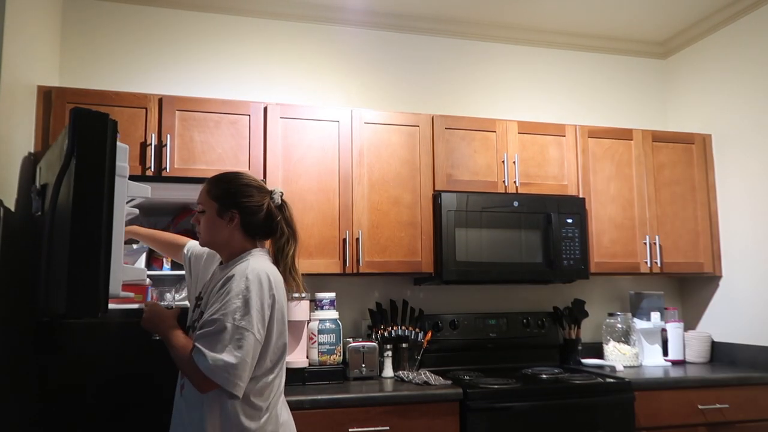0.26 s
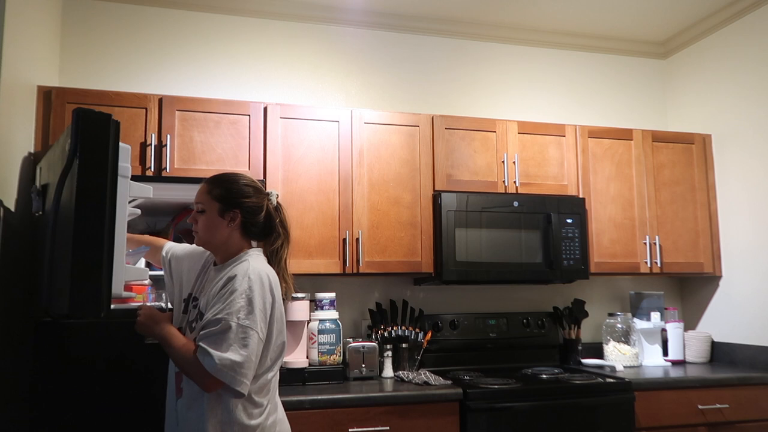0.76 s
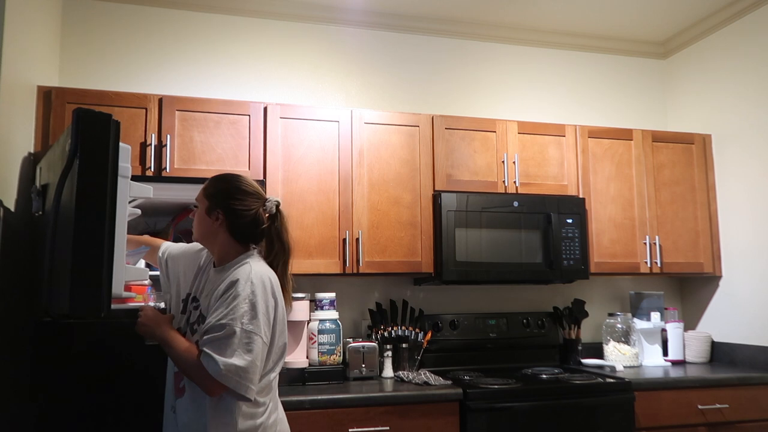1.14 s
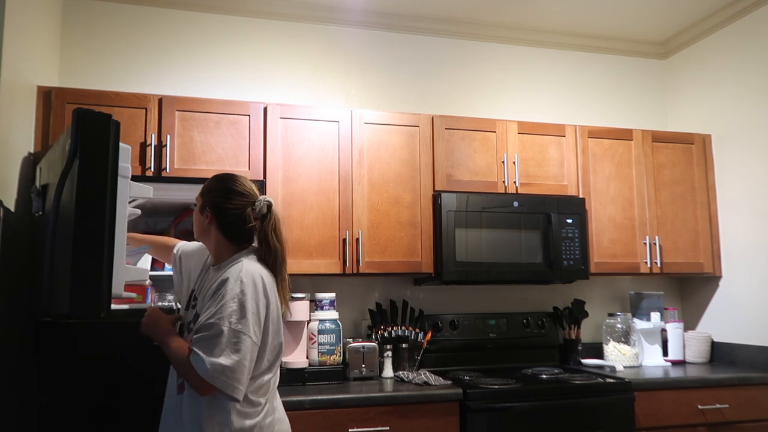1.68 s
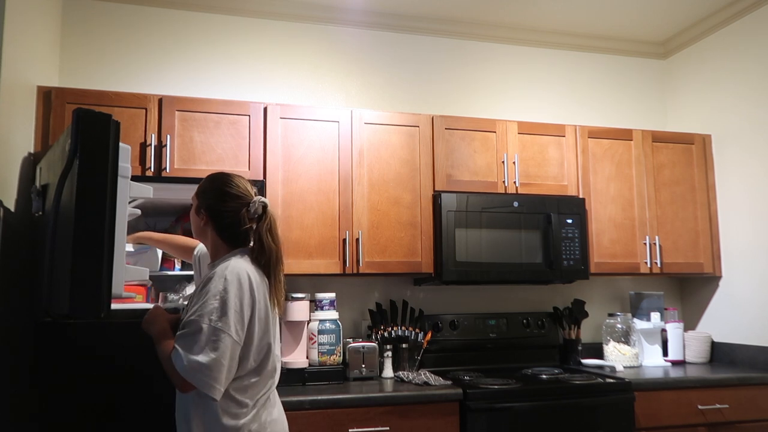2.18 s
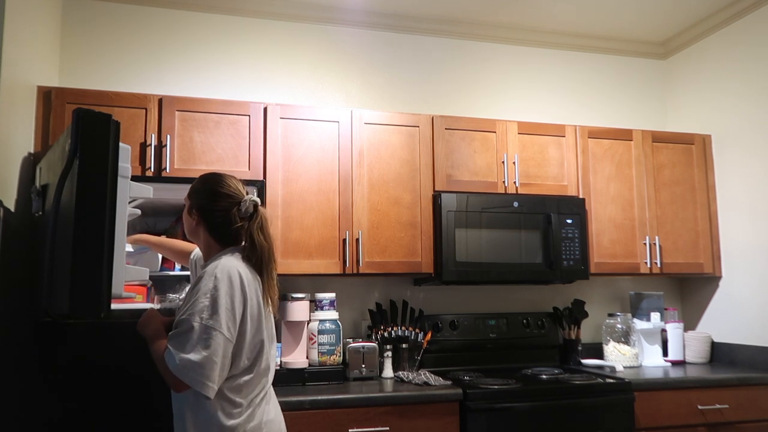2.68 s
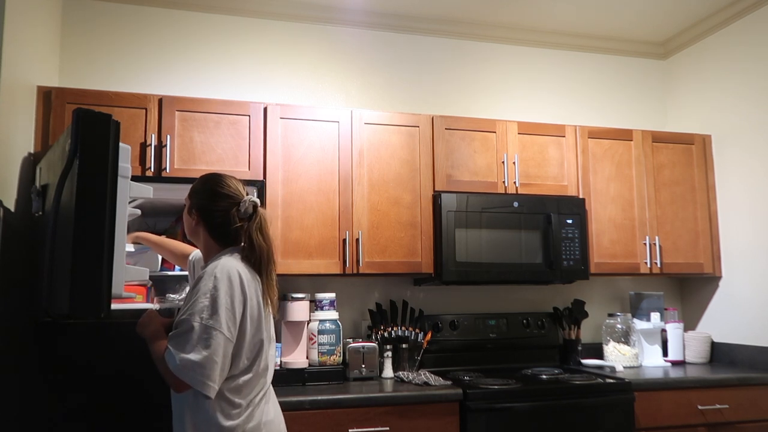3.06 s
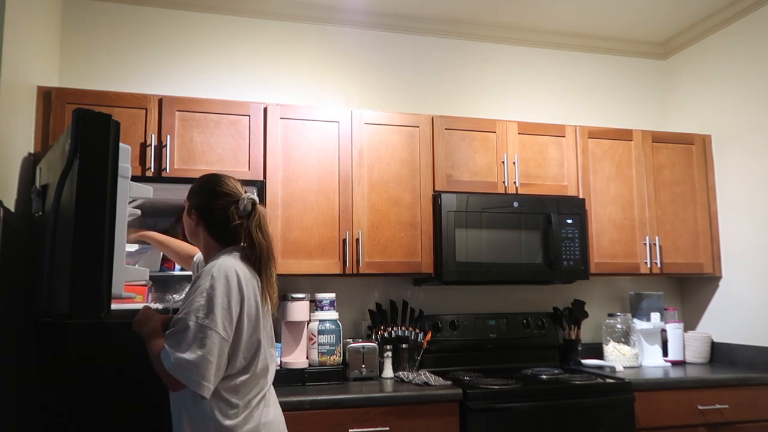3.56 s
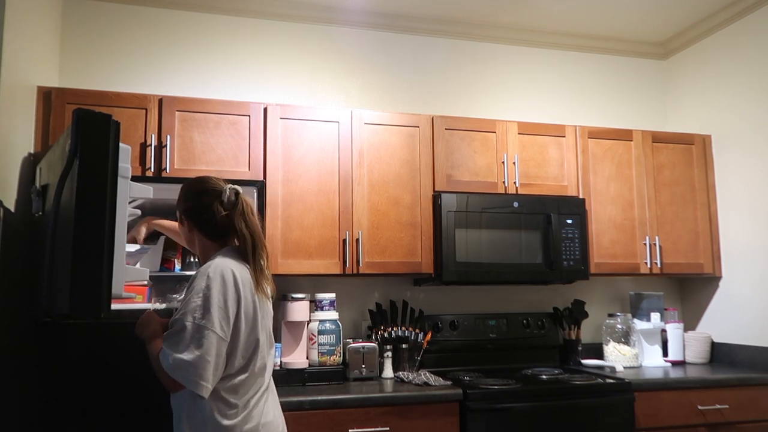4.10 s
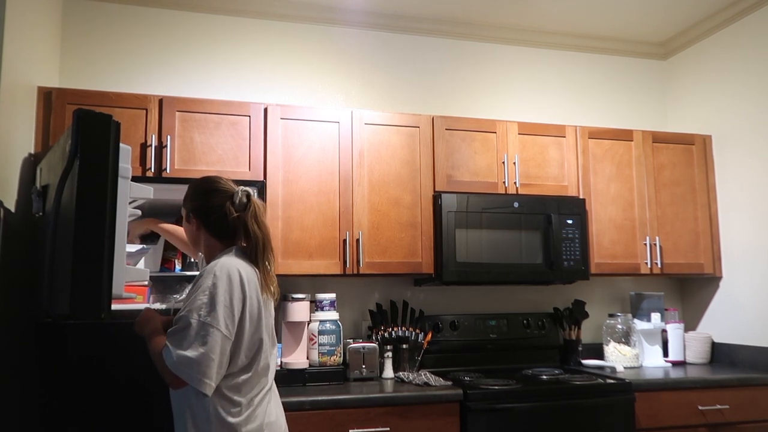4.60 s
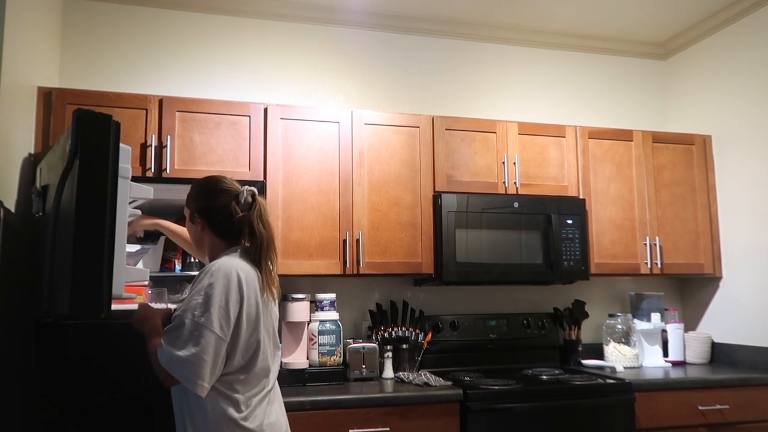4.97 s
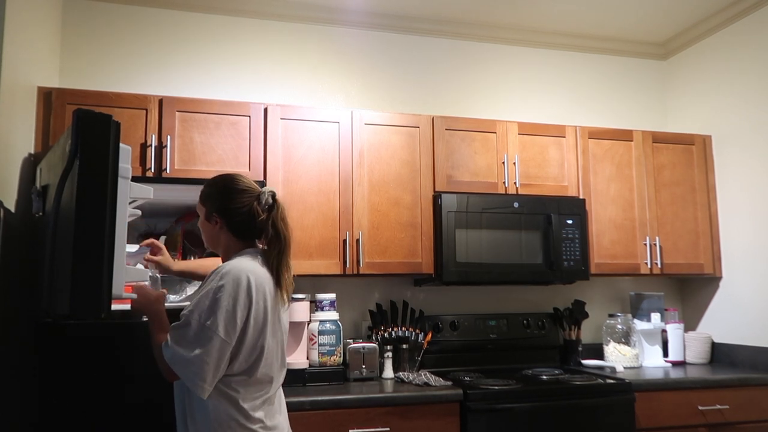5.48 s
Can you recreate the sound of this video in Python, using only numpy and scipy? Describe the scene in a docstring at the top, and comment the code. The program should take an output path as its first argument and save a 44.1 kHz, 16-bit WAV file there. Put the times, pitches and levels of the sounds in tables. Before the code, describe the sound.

Containers and bottles are moved about in an open fridge in a kitchen. Faint ticks come first, a hard knock at about one second, then a busy clatter with scrapes, thuds and small glass clinks. It thins to near quiet before a sharp plastic snap. Steady compressor hum and fan air lie beneath; close, nearly central sound with a short room tail.

```python
"""Containers shifted in an open fridge

Plastic tubs and bottles clack, tick and scrape on the shelves: noisy strikes on many short modes.
Heavy ones land with dull knocks, swelling low tones that set the liner ringing; glass clinks now and then.
A plastic bin snaps near the end. The compartment and the kitchen ring after each blow.
The compressor hums as a few steady tones, and its fan blows throughout as coloured noise."""
import sys
import numpy as np
from scipy import signal
from scipy.fft import rfft, irfft, next_fast_len
from scipy.io import wavfile

SR = 44100
rng = np.random.default_rng(int(sys.argv[2]) if len(sys.argv) > 2 else 0)


def wav_record(signal):
    """Record a signal, one row per channel, as 16-bit PCM in the file named by sys.argv[1]."""
    frames = np.transpose(np.atleast_2d(signal))
    bounded = np.clip(frames, -1, 1)
    # unit amplitude maps onto the largest positive 16-bit level
    quanta = np.round(bounded * 32767).astype(np.int16)
    wavfile.write(sys.argv[1], SR, quanta)


N = 253134
TIME = np.arange(N) / SR

# tubs and bottles clack together: (time [s], middle-zone level over 10 ms [dB], body re middle [dB],
# edge re middle [dB], the item's own resonance [Hz], its boost or cut [dB])
CLACK_EVENTS = [(0.285, -50, 9, -2.5, 1020, 10), (0.553, -49, 3, -6, 600, 11),
                (0.592, -56, 13, -12, 1000, 0), (0.713, -47.5, 7, -4, 724, 16),
                (0.785, -53, 13.5, -12, 850, 30), (1.01, -39, 8, -4.5, 1600, 14.5),
                (1.029, -43, 0, -14, 2000, 18), (1.052, -50, 1, -16, 2000, 16),
                (1.067, -35.5, -10, -1, 5370, 8.0), (1.084, -36.5, 1, 1.5, 940, -12),
                (1.104, -34, 12.5, -11, 1250, 1.5), (1.131, -28.5, 3, -1.5, 1300, 7),
                (1.266, -39, 0, -7.5, 880, 5), (1.298, -40.5, 0.5, -3, 660, -8),
                (1.408, -42, 0, -17, 1560, 18), (1.472, -53, -12, 0, 3240, 6),
                (1.513, -38, -3, -2.5, 1010, 15), (1.58, -42.5, 8.5, -6.5, 726, 6),
                (1.661, -38.5, 1, -2, 3120, 10), (1.7075, -33, 0.5, -2.5, 620, 14),
                (1.887, -39.5, 3, -26, 694, 12), (1.944, -43.5, 4, -6, 900, 0),
                (2.026, -36.5, -3, -20, 930, 9), (2.083, -39, -0.5, -10, 970, 26),
                (2.254, -42.5, 4.5, -13, 600, 4), (2.401, -33, 1, -11, 630, 6),
                (2.42, -26, -7, -5.5, 610, 7), (2.439, -25, -5, -4.5, 610, 1),
                (2.464, -24, 0.5, -10.5, 580, 9.5), (2.477, -26.5, 0.5, -9.5, 2340, 4),
                (2.516, -28.5, -2, -11, 2580, 2), (2.549, -29.5, -13, -12, 2590, 4),
                (2.58, -31, -11, -19, 844, 0), (2.609, -26, -8, -10, 650, 2), (2.665, -41, 1, -19, 940, 11),
                (2.691, -26.5, -0.5, -19, 615, 26), (2.718, -29, -1, -12, 620, 10),
                (2.818, -21.5, -4.5, -6, 980, 13), (2.917, -35, 9, -24, 646, 2),
                (2.938, -24, 4.5, -10.5, 645, 8), (2.982, -16, -6, -13, 616, 0),
                (3.01, -17, -4, -10.5, 580, 10), (3.025, -24, -3, -6, 730, 3),
                (3.035, -21, -11, -6.5, 785, 6), (3.068, -18.5, -6, -10, 1830, 10),
                (3.094, -22.5, -0.5, -13, 810, 8), (3.12, -26, -3, -23, 885, 12),
                (3.157, -23.5, -4, -13, 935, 14), (3.168, -29.5, -13, -8, 864, 11),
                (3.222, -32, 3, -5.5, 970, 10), (3.292, -22.5, 1.5, -17, 760, 8),
                (3.333, -25, -2, -9.5, 890, 21), (3.361, -31, -1, -10.5, 834, 5),
                (3.398, -24, -4, -18, 3060, 9), (3.478, -29, 2.5, -11, 1210, 1),
                (3.5255, -26, -6, -9, 794, 7), (3.545, -37, 4, -15, 940, 4), (3.663, -25, 2.5, -13, 700, 9),
                (3.677, -18, -6, -14.5, 2540, 2), (3.777, -19.5, -3.5, -7, 650, 12),
                (3.784, -20.5, 3, -9.5, 1790, 6), (3.819, -30, 4, -22, 1760, 23),
                (3.832, -35, 7, -22, 1260, 10), (3.973, -36.5, 3.5, -11, 670, 8),
                (4.044, -31.5, -4.5, -19, 660, 18), (4.096, -31.5, -2, -12, 605, 9),
                (4.117, -36, -6, -10, 930, 7.0), (4.1455, -29.5, 1, -6, 1000, 4),
                (4.174, -26, -1, -7.5, 660, 5), (4.219, -30, 4, -9, 603, 19),
                (4.237, -27.5, -1, -29, 2070, 7), (4.261, -31, -0.5, -16, 820, -1),
                (4.288, -34, 0, -9, 1440, 14), (4.326, -36, -8, -2, 760, 8.0),
                (4.371, -39.5, 3.5, -11, 970, 8), (4.475, -42, 2, -8, 890, 12),
                (4.498, -39, 1, -21, 965, 11), (4.533, -34.5, -2.5, -8.5, 664, 3),
                (4.79, -53, 3, -10, 1920, 19), (5.433, -52, 11, -23, 1920, 13),
                (5.562, -58, -3, 5.5, 600, 10.0), (5.736, -16, -11, -4.5, 1570, 6)]
# heavy things set down or bumped against the liner: (time [s], level of the bend [dB], pitch [Hz],
# half the time to its fullest swell [cycles], ring at that pitch [dB], clatter [dB])
KNOCK_EVENTS = [(.086, -27, 280, 0.29, -55, -42.5), (1.0952, -16, 620, 0.48, -42, -34),
                (1.1002, -3, 431, 0.4, -26, -32), (1.108, -21, 570, 0.3, -34, -37),
                (1.11, -22, 834, 0.72, -34, -30), (1.106, -25, 1835, 1.9, -35, -37),
                (1.862, -30.5, 408, 1.7, -39, -37.5), (2.126, -28, 633, 1, -36, -34.5),
                (2.463, -27, 625, 1.6, -36, -36), (2.6276, -3.5, 382, 0.22, -48, -26.5),
                (2.82, -13, 298, 0.49, -29, -22.5), (2.868, -4.5, 382, 0.25, -40, -30),
                (2.873, -10.5, 294, 1.05, -34, -23), (2.9088, -8.5, 315, 0.32, -36, -21),
                (2.941, -42, 348, 0.68, -29, -41), (2.973, -20, 310, 0.48, -27, -30),
                (3.023, -19, 360, 0.87, -35, -35), (3.038, -13.5, 273, 0.65, -26, -24.5),
                (3.127, -23, 310, 0.89, -35, -38), (3.187, -38, 290, 1, -43, -35),
                (3.218, -29, 285, 1.3, -37, -41), (3.293, -38, 890, 0.71, -31, -37),
                (3.478, -16.5, 394, 0.39, -47, -40), (3.6625, -27, 711, 0.91, -25.5, -35),
                (3.678, -23, 656, 1.2, -31, -38), (3.687, -16.5, 898, 1.1, -32, -32),
                (3.783, -26, 660, 1.3, -43, -28), (3.788, -14.5, 1063, 1.2, -33, -32),
                (3.826, -32, 1140, 2, -40, -31), (4.046, -30.5, 344, 0.88, -50, -34.5),
                (4.216, -22, 685, 0.65, -30, -23), (4.238, -33, 730, 0.91, -42, -43),
                (5.16, -37, 300, 0.84, -44, -43), (5.194, -36, 320, 0.72, -46, -47),
                (5.698, -36, 506, 0.5, -42, -33.5)]


def from_db(db):
    """Decibels to amplitude."""
    return 10 ** (np.asarray(db) / 20)


def decay(t, t60):
    """Exponential die-away, 60 dB down after t60 seconds."""
    return np.exp(-np.log(1000) * t / t60)


def unit_energy(x):
    """Scale so that the squares sum to one."""
    return x / np.sqrt(np.sum(x ** 2) + 1e-20)


def at_hz(points, hz):
    """Read a spectrum on a log-frequency axis."""
    f, value = np.transpose(points)
    return np.interp(np.log(hz + 1e-6), np.log(f), value)


def colour(x, spectrum):
    """Filter by a smooth spectrum in dB."""
    size = next_fast_len(2 * len(x))
    gain = from_db(at_hz(spectrum, np.fft.rfftfreq(size, 1 / SR)))
    return irfft(rfft(x, size) * gain, size)[:len(x)]


def highpass(x, order, hz):
    """Take away the deep bass with a Butterworth filter."""
    return signal.sosfilt(signal.butter(order, hz, "high", fs=SR, output="sos"), x)


def add(out, s, sound):
    """Mix a sound in at a time."""
    at = round(s * SR)
    out[at:at + len(sound)] += sound[:max(N - at, 0)]


def convolve(x, response):
    """Answer every sample of x with the response, cut to the scene's length."""
    return signal.oaconvolve(x, response)[:N]


def ring(hits, modes, spread_db):
    """Every hit (s, dB) strikes every decaying sine mode with a strength of its own."""
    out, t = np.zeros(N), TIME[:SR // 2]
    hz, mode_db, t60 = np.transpose(modes)
    shapes = np.sin(2 * np.pi * hz[:, None] * t) * decay(t, t60[:, None])
    lucks = rng.standard_normal((len(hits), len(modes)))
    for (s, db, *_), luck in zip(hits, lucks):
        strengths = from_db(db + mode_db + spread_db * luck)
        add(out, s, strengths @ shapes)
    return out


def machine():
    """Compressor and mains tones waver slightly in phase over the fan's coloured noise; mid and side."""
    # compressor and mains lines: (frequency [Hz], level [dB rms])
    hum = [(59.8, -57.5), (119.7, -49), (156.5, -48), (175, -56), (211, -51), (218, -53)]
    # colour of the steady fan air: (frequency [Hz], relative density [dB per Hz])
    fan = [(20, -27), (45, -13), (90, -10), (135, -7.5), (185, -5), (222, 1.5), (280, -0.5), (345, -6.5),
           (440, -5), (495, -7.5), (550, -3.5), (630, -12.5), (750, -14.5), (1150, -20), (1650, -18.5),
           (3200, -30.5), (6300, -39.5), (10000, -48), (14000, -55)]
    fan_db = -40   # rms, before the stereo width
    air = [unit_energy(colour(rng.standard_normal(N), fan)) * np.sqrt(N) for channel in range(2)]
    mid, side = from_db(fan_db) * np.array(air)
    for hz, db in hum:
        waver = np.interp(TIME, np.linspace(0, TIME[-1], 30), rng.standard_normal(30))
        phase = 2 * np.pi * (hz * TIME + rng.random()) + .5 * waver
        mid = mid + np.sqrt(2) * from_db(db) * np.sin(phase)
    return np.array([mid, side])


def kitchen(x, room_db, build_up_s):
    """The room's diffuse tail: bands of noise that build up softly and die sooner at high treble."""
    # kitchen decay: (frequency [Hz], t60 [s])
    kitchen_t60 = [(120, 0.9), (300, 0.49), (700, 0.62), (1800, 0.69), (4800, 0.45), (8000, 0.38),
                   (13000, 0.3)]
    t = TIME[:SR * 3 // 4]
    tail, edges = 0, np.geomspace(60, 19000, 12)
    for low, high in zip(edges, edges[1:]):
        band_filter = signal.butter(2, [low, high], "band", fs=SR, output="sos")
        band = signal.sosfilt(band_filter, rng.standard_normal(len(t)))
        tail = tail + band * decay(t, at_hz(kitchen_t60, np.sqrt(low * high)))
    build_up = 1 - np.exp(-(t / build_up_s) ** 2)
    return from_db(room_db) * convolve(x, unit_energy(tail * build_up))


def roaming_tail(x, room_db, reaches_per_s=2.239):
    """The hand moves to and fro between two spots on the shelves, each with a room tail of its own."""
    place = np.pi * reaches_per_s * TIME
    shares = (np.cos(place), np.sin(place))
    return sum(kitchen(x * share, room_db, build_up_s=0.011) for share in shares)


def compartment(x, echo_db=-7, t60=.14):
    """Quick echoes between the fridge walls, a fresh decaying noise pattern for every blow."""
    t = TIME[:SR // 8]
    echoes = unit_energy(rng.standard_normal(len(t)) * decay(t, t60) * (t > .003))
    direct = t == 0
    return signal.fftconvolve(x, from_db(echo_db) * echoes + direct)[:N]


def plastic_modes(count=800):
    """A thicket of shelf and tub modes in three overlapping zones: (Hz, undamped waveforms) for each."""
    # colour of the plastic shelves and tubs: (frequency [Hz], relative mode level [dB])
    plastic = [(250, -79), (450, -1), (750, 1.5), (1000, -1), (1450, -2.5), (1900, -2), (2900, -2),
               (4000, -8.5), (5200, -15), (6800, -23.5), (8000, -30), (9300, -32.5), (12000, -42.5),
               (15000, -58)]
    # borders of body | middle | edge: (frequency [Hz])
    zone_edges = [1800, 5300]
    hz = np.linspace(280, 15000, count) + rng.uniform(-9, 9, count)
    # jitter the sorting so that the zones overlap
    zone = np.searchsorted(zone_edges, hz * np.exp(.17 * rng.standard_normal(count)))
    waves = np.sin(2 * np.pi * hz[:, None] * TIME[:SR // 10])
    shapes = from_db(at_hz(plastic, hz))[:, None] * waves
    return [(hz[zone == k], shapes[zone == k]) for k in range(3)]


def strike(modes, t60, rise_s, colour_db=0, patchy_db=2.0):
    """One contact: it favours pitches of its own, and the place of touch sets the sign of each mode."""
    hz, shapes = modes
    t = TIME[:shapes.shape[1]]
    pitch_grid = np.linspace(np.log(280), np.log(15000), 40)
    favoured = np.interp(np.log(hz), pitch_grid, rng.standard_normal(40))
    strengths = from_db(colour_db + patchy_db * favoured) * rng.standard_normal(len(hz))
    bite = 1 - np.exp(-(t / rise_s) ** 1.4)
    return unit_energy(strengths @ shapes * decay(t, t60) * bite)


def contact(zones, db, body_db, edge_db, t60, rise_s, item_hz=1000, boost_db=0):
    """One blow on the three plastic zones, coloured by the item's resonance, echoing in the compartment."""
    item_width = 0.13   # of the resonance, as a share of its pitch
    # contacts with a weak edge lose more top: dB per octave for each dB of edge
    top_from_hz, top_tilt = 4400, 0.6
    ten_ms = SR / 100   # samples
    blow = 0
    for modes, zone_db in zip(zones, (body_db, 0, edge_db)):
        hz = modes[0]
        resonance_db = boost_db * np.exp(-(np.log(hz / item_hz) / item_width) ** 2)
        top_db = top_tilt * edge_db * np.log2(np.maximum(hz / top_from_hz, 1))
        blow = blow + from_db(db + zone_db) * strike(modes, t60, rise_s, resonance_db + top_db)
    return np.sqrt(ten_ms) * compartment(blow)


def drag_force():
    """Each drag builds, holds and dies away, over a faint rustle: gains of body, middle and edge."""
    # containers dragged over the shelf: (time [s], length [s], level [dB], body re level [dB],
    # edge re level [dB])
    drags = [(0.346, 0.089, -55, 3.5, -15), (0.567, 0.036, -56, 9, -5), (0.684, 0.093, -49.5, 2, -9),
             (0.992, 0.23, -47.5, -3, -7), (1.43, 0.4, -50.5, 4, -9.5), (1.865, 0.22, -48.5, 7.5, -8.5),
             (2.393, 0.23, -32.5, -3, -14.5), (2.658, 0.2, -33, -2, -14.5), (2.937, 0.19, -29, 3, -19),
             (3.288, 0.11, -34.5, 4.5, -17), (3.517, 0.025, -32.5, 1, -9), (3.675, 0.16, -34, 0, -19),
             (4.115, 0.18, -37.5, 1, -15), (4.323, 0.083, -44.5, 5, -16), (4.458, 0.094, -47, 6.5, -15),
             (4.777, 0.037, -62, 0, -0.5), (5.15, 0.09, -60.5, 1, -10)]
    # the arm brushes past things all the while: (time [s], level [dB])
    rustle = [(0, -58.5), (.22, -61.5), (.5, -66), (.85, -72), (.97, -63), (1.35, -66), (2.3, -63),
              (4.7, -66), (4.86, -62), (5.05, -87), (5.25, -65), (5.7, -59)]
    rustle_zones_db = [1.5, 0, -5.5]   # body, middle, edge
    attack_s, release_t60_s = 0.025, 0.28
    rustle_db = np.interp(TIME, *np.transpose(rustle))
    power = np.outer(from_db(rustle_zones_db), from_db(rustle_db)) ** 2
    for s, length, db, body_db, edge_db in drags:
        build = np.clip((TIME - s) / attack_s, 0, 1)
        release = decay(np.maximum(TIME - s - length, 0), release_t60_s)
        power += np.outer(from_db([body_db, 0, edge_db]), from_db(db) * build * release) ** 2
    return np.sqrt(power)


def scrape(zones, slips_per_s=75, uneven_db=3.9, count=7):
    """A dragged container sticks and slips at a few points, each slip a tiny strike."""
    out, force = np.zeros(N), drag_force()
    for point in range(count):
        slipping = rng.random(N) < slips_per_s / SR
        slips = slipping * from_db(uneven_db * np.minimum(rng.exponential(1, N), 4))
        slips = unit_energy(slips * rng.choice([-1, 1], N)) * np.sqrt(N / count)
        for modes, gain in zip(zones, force):
            out += convolve(slips * gain, strike(modes, t60=0.023, rise_s=0.000071, patchy_db=1.7))
    return out


def bottles():
    """Bottles standing on the shelf ring faintly with every clack."""
    # modes: (frequency [Hz], level re the clack [dB], t60 [s])
    bottle_modes = [(869, -19.5, 0.8), (1093, -28, 0.33), (1300, -22.5, 0.65), (1870, -20, 0.36),
                    (2460, -23.5, 0.22), (2990, -21, 0.17), (3180, -25, 0.13), (3460, -16, 0.21)]
    return ring(CLACK_EVENTS, bottle_modes, spread_db=3)


def clinks():
    """Glass touches glass: each jar rings briefly in three modes at its own high pitch."""
    # touches: (time [s], level [dB], pitch [Hz])
    touches = [(1.131, -40, 9440), (2.821, -31, 7100), (2.984, -33, 7100), (3.0365, -20.5, 7120),
               (4.17, -33.5, 9250), (4.326, -60, 9400)]
    # modes of a jar: (ratio to its pitch, level [dB], t60 [s])
    glass_modes = [(1, -3, .075), (1.012, -24, .13), (1.24, -17, .07)]
    out = np.zeros(N)
    for s, db, hz in touches:
        modes = [(hz * ratio, level, t60) for ratio, level, t60 in glass_modes]
        out += ring([(s, db)], modes, spread_db=2)
    return out


def ticks(zones):
    """Hard rims and caps flick together: an instant bite, a pitch of their own and a very short ring."""
    # flicks: (time [s], middle-zone level over 10 ms [dB], pitch [Hz])
    flicks = [(1.012, -41, 2250), (1.0703, -39, 5600), (1.0852, -45, 5400), (1.0958, -38, 5400),
              (1.1075, -39, 5700), (1.1337, -30.5, 5460), (1.1492, -38, 4600), (1.666, -35.5, 4700),
              (1.7113, -38.5, 4370), (2.442, -26.5, 4280), (2.475, -30, 3300), (2.6099, -33, 6050),
              (2.6918, -30.5, 3870), (2.722, -30.5, 3240), (2.8217, -26.5, 4700), (2.9835, -27, 3000),
              (3.0695, -30, 3340), (3.095, -31, 3300), (3.0118, -25, 3070), (3.2952, -33, 2660),
              (3.338, -30, 4100), (3.4018, -33, 3120), (3.4815, -33, 4900), (3.5275, -27.5, 3760),
              (3.664, -35, 2410), (3.6785, -27, 2560), (3.784, -21, 2450), (3.7879, -24.5, 3700),
              (4.148, -33.5, 3400), (4.2385, -36, 2730)]
    out = np.zeros(N)
    for s, db, hz in flicks:
        add(out, s, contact(zones, db, body_db=-7, edge_db=-6.5, t60=0.013, rise_s=0.00011,
                            item_hz=hz, boost_db=10))
    return out


def bin_snaps(zones):
    """A stiff plastic bin snaps against its rail: a sharp crack and a short ring of its modes."""
    # snaps: (time [s], level [dB])
    snaps = [(5.7202, -17), (5.7242, -21.5)]
    # modes of the bin: (frequency [Hz], level re the snap [dB], t60 [s])
    bin_modes = [(1610, -13, 0.06), (1600, -2, 0.083), (2810, -24, 0.075), (3700, 2, 0.065),
                 (4370, -2, .06), (4700, 1.5, 0.11)]
    out = ring(snaps, bin_modes, spread_db=3)
    for s, db in snaps:
        add(out, s, contact(zones, db + 1.5, body_db=-19, edge_db=-8.5, t60=0.03, rise_s=0.00018))
    return out


def knocks():
    """A soft, heavy contact bends the shelf briefly and leaves the container and the liner ringing."""
    # modes of the liner: (frequency [Hz], level re the knock [dB], t60 [s])
    liner_modes = [(129.4, -19.5, 0.24), (174, -29, 0.21), (238, -23.5, 0.27), (294, -32, .3),
                   (447, -30, 0.53)]
    liner_pitch_hz, liner_loss_db_per_octave = 447, 32   # higher-pitched things shake the liner less
    out, t = np.zeros(N), TIME[:SR // 10]
    shakes = []
    for s, db, hz, cycles, ring_db, _ in KNOCK_EVENTS:
        swell_s = cycles / hz
        # rises to one at twice swell_s, then dies away
        push = (t / (2 * swell_s)) ** 2 * np.exp(2 - t / swell_s)
        bend = from_db(db) * push * np.sin(2 * np.pi * hz * t)
        add(out, s, compartment(bend, echo_db=-5, t60=.07))
        out += ring([(s, ring_db)], [(hz, 0, 0.092)], spread_db=6)
        octaves_above = max(np.log2(hz / liner_pitch_hz), 0)
        shakes.append((s, db - liner_loss_db_per_octave * octaves_above))
    out += ring(shakes, liner_modes, spread_db=0.5)
    # a small panel radiates no deep bass
    return highpass(out, 3, 85)


def clatter(zones):
    """Knocked containers clatter just after the blow, mostly in the body zone."""
    out, lag_s = np.zeros(N), 0.00201
    for s, *_, body_level_db in KNOCK_EVENTS:
        add(out, s + lag_s, contact(zones, body_level_db - 12.5, body_db=12.5, edge_db=-6.5,
                                    t60=0.14, rise_s=0.006))
    return out


def clacks(zones):
    """Tubs and bottles hit the shelf and each other; each clack has a fainter, shorter burst 3 ms ahead."""
    lead_in_s, lead_in_db = .003, -12.5
    out = np.zeros(N)
    for s, db, body_db, edge_db, item_hz, boost_db in CLACK_EVENTS:
        lead_in = contact(zones, db + lead_in_db, body_db, edge_db, t60=0.011, rise_s=0.0019)
        add(out, s - lead_in_s, lead_in)
        # the more body a contact has, the more slowly it bites
        rise_s = 0.00093 * from_db(0.6 * body_db)
        add(out, s, contact(zones, db, body_db, edge_db, 0.091, rise_s, item_hz, boost_db))
    return out


def scene():
    """Mix hard and dull contacts, direct and in the room, with the machine; left and right."""
    # stereo width: (frequency [Hz], gain on the side signal [dB])
    width = [(25, -33), (60, -26), (125, -32), (250, -20), (500, -19.5), (1000, -15.5), (2000, -15),
             (4000, -5), (8000, 4), (12000, 6.5)]
    zones = plastic_modes()
    hard = scrape(zones) + bottles() + clinks() + ticks(zones)
    hard += bin_snaps(zones) + clatter(zones) + clacks(zones)
    # light containers radiate almost no bass
    hard = highpass(hard, 2, 140)
    dull = knocks()
    close = hard + dull
    # a tiny lag between the microphones puts a quarter-cycle-shifted copy into the side signal
    shifted = -signal.hilbert(close, next_fast_len(N + SR))[:N].imag
    direct = np.array([close, from_db(-7) * shifted])
    wet = np.array([roaming_tail(hard, room_db=-10) + kitchen(dull, room_db=-9.5, build_up_s=0.0065)
                    for channel in range(2)])
    # diffuse sound differs more between the microphones than direct sound
    mid, side = direct + wet * from_db([[0], [2.5]]) + machine()
    side = colour(side, width)
    return np.array([mid + side, mid - side])


def record(dry):
    """The highest peaks are rounded and the top is cut steeply."""
    rounded = dry / (1 + (dry / .95) ** 6) ** (1 / 6)
    # 70 dB down from 15.9 kHz upward
    return signal.sosfilt(signal.cheby2(12, 70, 15900, fs=SR, output="sos"), rounded)


dry = scene()
out = record(dry)
wav_record(out)
```